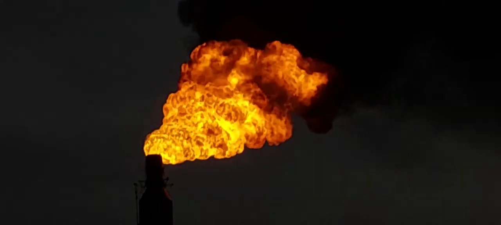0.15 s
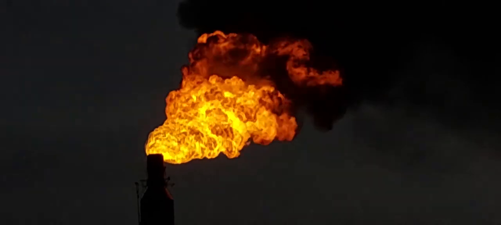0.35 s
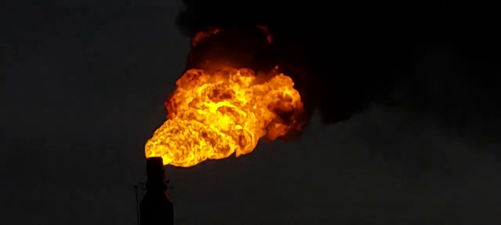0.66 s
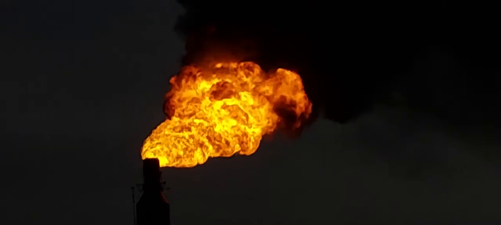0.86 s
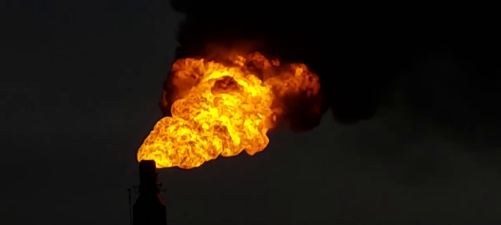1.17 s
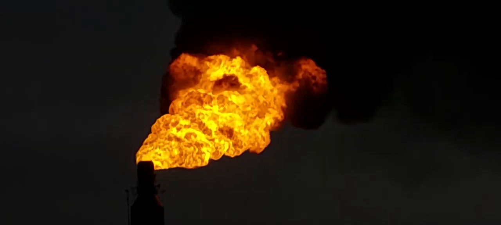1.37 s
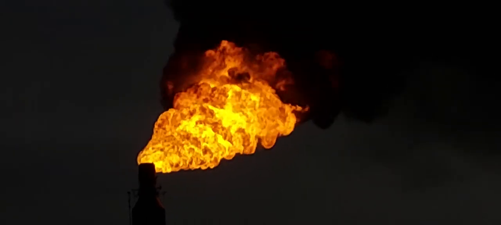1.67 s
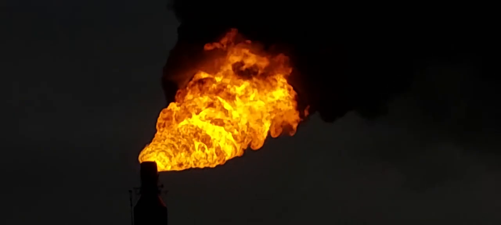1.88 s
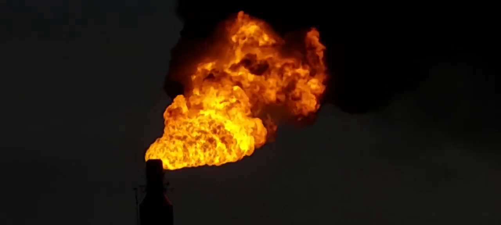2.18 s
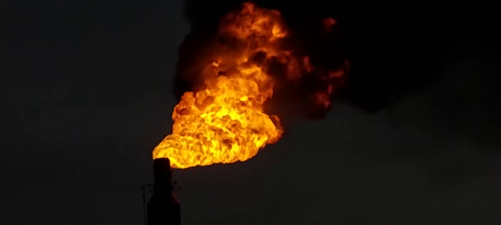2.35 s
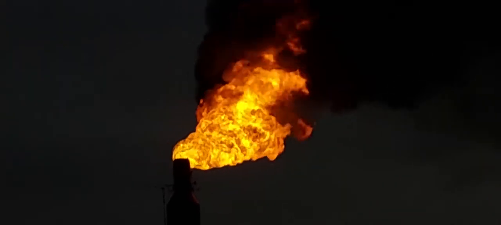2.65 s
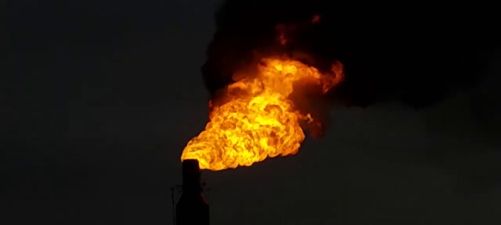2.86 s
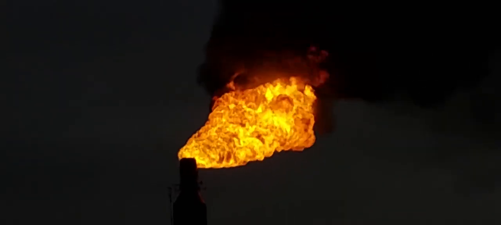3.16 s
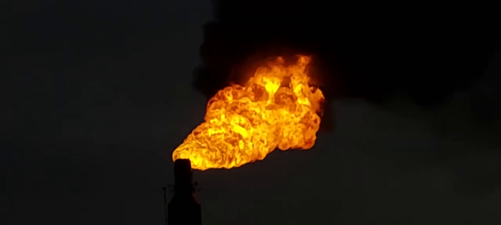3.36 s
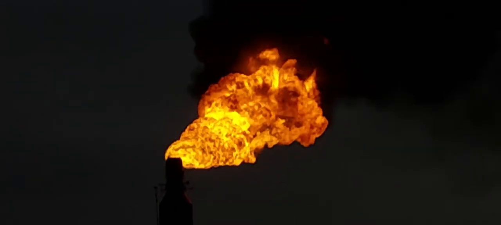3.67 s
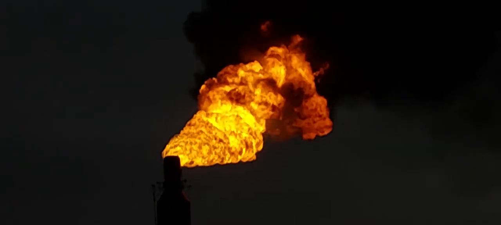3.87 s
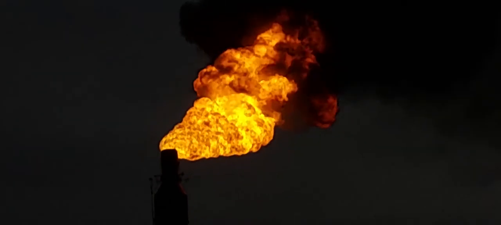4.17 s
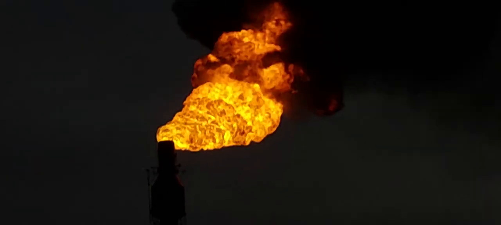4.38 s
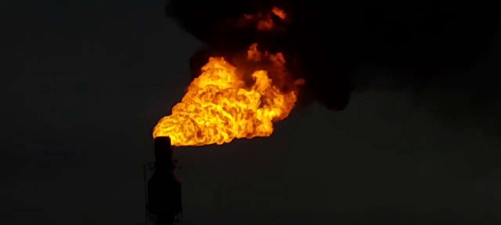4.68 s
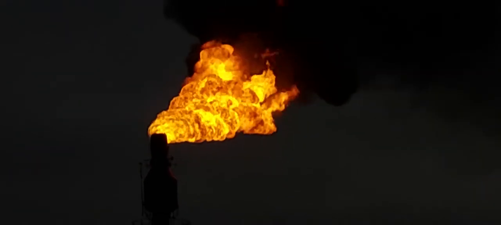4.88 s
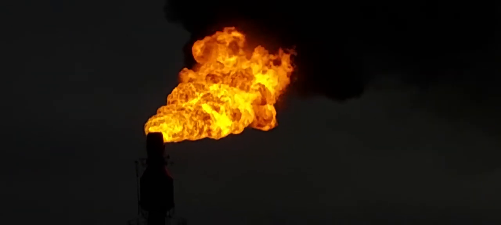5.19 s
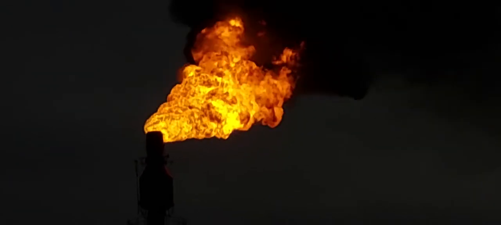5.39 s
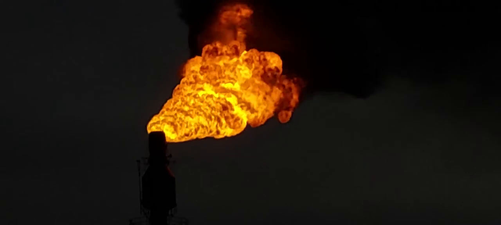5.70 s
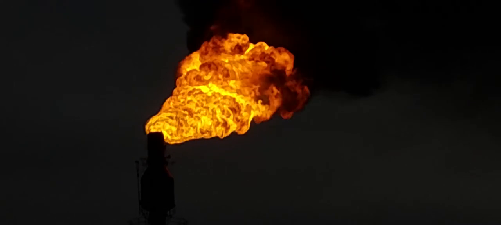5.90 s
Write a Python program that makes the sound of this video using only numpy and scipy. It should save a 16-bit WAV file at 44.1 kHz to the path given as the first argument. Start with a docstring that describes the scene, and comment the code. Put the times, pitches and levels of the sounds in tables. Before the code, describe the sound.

A big gas flare burns without pause on an offshore platform: a dense, low, rumbling roar arriving from the left and spreading diffusely off the steel deck. A strong steady bass hum from a diesel generator sits beneath, with beating motor drones. Thin turbine whines near two kilohertz flutter, and a fainter compressor tone sits higher. Two microphone ports hear it, the right one duller in the treble.

```python
"""A large gas flare roars on an offshore platform, as shaped noise arriving from the left; the steel deck
sends back a diffuse rumble. Behind it a diesel generator hums on its firing tone and cycle orders, and
machines drone as beating and wavering sines. Two turbines and a compressor whine through turbulent air.
Two microphone ports pick it up, the right one muffled in the treble."""
import sys
import numpy as np
from scipy import signal
from scipy.fft import rfft, irfft, next_fast_len
from scipy.io import wavfile
from scipy.ndimage import uniform_filter1d

SR = 44100
rng = np.random.default_rng(int(sys.argv[2]) if len(sys.argv) > 2 else 0)


def put_to_file(sound):
    """Save the sound as 16-bit audio at rate SR, in the file named by the first command-line argument."""
    columns = np.atleast_2d(sound).T  # one column per channel
    safe = np.clip(columns, -1, 1)
    whole_steps = np.round(safe * 32767)
    wavfile.write(sys.argv[1], SR, whole_steps.astype(np.int16))


N = 266364

# Flame strength; only the rumble's mean sets the flare's level, the rest is swell about the mean:
# (time [s], roar level [dB], rumble level [dB])
FLAME_SWELL = [(0.0, -41, -30), (0.6, -40.5, -29.5), (1.21, -40, -28.5), (1.81, -40.5, -30.5),
               (2.42, -40.5, -28.5), (3.02, -40, -28.5), (3.62, -40, -31), (4.23, -40, -29.5),
               (4.83, -40.5, -29), (5.44, -40, -31), (6.04, -39.5, -30)]
# Relative spectrum of the roar: (frequency [Hz], density [dB per Hz])
ROAR_SPECTRUM = [(20, -38.5), (45, -19), (70, -8.5), (130, -11.5), (260, -11), (400, -18.5), (500, -25),
                 (1000, -28), (1600, -35.5), (2900, -41.5), (6000, -45), (8000, -47), (9000, -60),
                 (15700, -63.5)]
# Resonances of pipes and steelwork: (frequency [Hz], width [Hz], height over the roar [dB])
STEEL_RESONANCES = [(247, 22, 4.5), (296, 25, -3), (320, 23, 4), (430, 36, 3), (537, 29, 4.5),
                    (625, 16, 1.5), (712, 55, 5), (935, 30, 2), (2255, 1380, 7.5), (3630, 380, 4),
                    (4260, 440, 3.5), (5370, 370, 2.5), (11300, 1500, 2)]
# Likeness of the ports: (frequency [Hz], share thrown back evenly by the deck [0-1], share from the left [0-1])
PORT_LIKENESS = [(60, 0.76, 0.079), (202, 0.67, 0.3), (397, 0.39, 0.3), (700, 0.27, .4), (1110, 0.12, 0.57),
                 (1550, .05, 0.24), (1990, 0.13, 0.45), (3500, 0.02, 0.39), (4960, .02, 0.097),
                 (6500, 0.02, 0.091)]
# Generator, six firings a cycle: (multiple of the cycle rate [1], level [dB])
CYCLE_ORDERS = [(3, -52.5), (5, -57.5), (7, -45), (8, -55), (9, -41.5), (12, -41.5), (18, -50), (19, -55),
                (24, -62.5), (30, -51), (36, -59.5)]
# Pairs of like motors slightly out of step: (frequency [Hz], level of the first motor [dB],
# partner faster by [Hz], partner relative level [dB], in step at [s], wavering share [0-1])
MOTOR_PAIRS = [(54.72, -35.6, 1.49, -8, 2.6, .1), (74.38, -37.3, .91, -8, 2.39, .55)]
# Machine tones: (frequency [Hz], level [dB], wavering share [0-1], wavering width [Hz])
DRONES = [(112.4, -48, .3, 1), (136.3, -45, .3, 1), (151.4, -44.5, .5, 1.5), (164.2, -49, .4, 1),
          (202.5, -43, .7, 3), (230.5, -45, .4, 1), (248.3, -46, .5, 2), (320.5, -42, .8, 5),
          (599, -58, .4, 2), (1088.1, -64, .3, 1), (1094.8, -62, .3, 1), (1203.8, -62, .3, 1),
          (1238.2, -62, .4, 2), (1350.5, -59.5, .3, 1), (1369, -65, .3, 1), (1465, -65, .3, 1),
          (1686, -67, .3, 1), (9648, -87, .9, 12), (9952, -91, .9, 12), (11458, -77.5, .9, 12)]
# Blade tones of slower turbine, faster turbine, compressor: frequency [Hz] each
BLADE_HZ = [2132.5, 2138.5, 5429]
# Their swell as the air drifts: (time [s], slower turbine [dB], faster turbine [dB], compressor [dB])
BLADE_SWELL = [(0.0, -52.5, -52.5, -57.0), (0.169, -44, -47.5, -55.5), (0.4, -56.5, -45.0, -59),
               (0.7, -53.0, -49.5, -53.5), (1.0, -51.5, -45.5, -55.0), (1.299, -50, -52, -67),
               (1.57, -60.5, -46.5, -55), (2.1, -53.5, -43.5, -58), (2.4, -50.5, -54.5, -60.5),
               (2.55, -52.5, -52, -62.0), (2.75, -49, -48, -60.5), (3.25, -58.0, -53, -61),
               (3.45, -56, -57, -51), (3.7, -44, -49.0, -59), (4.049, -56, -52.0, -58),
               (4.5, -50.5, -47.5, -59.5), (4.85, -45.5, -43.5, -59.5), (5.3, -58.5, -52.5, -59),
               (5.549, -52, -52, -51.5), (5.801, -50.5, -49.0, -67), (6.04, -52, -43.5, -61)]
# Their paths, one row each: (right port against left [dB], wavering share [0-1], wavering width [Hz],
# mean halo level [dB], halo width [Hz], likeness of the ports [0-1])
BLADE_PATHS = [(-9, 0.13, 6, -54, 23, 0.88), (1, 0.4, 6, -51.5, 17, .75), (-6.5, .55, 14, -63, 41, 0.51)]
# Their octaves, one row each: (mean level [dB], wavering width [Hz])
BLADE_OCTAVES = [(-66.5, 22), (-65, 22), (-80, 32)]
# Colour of the right port against the left: (frequency [Hz], gain [dB])
RIGHT_PORT_COLOUR = [(60, 1), (300, 1), (750, 3), (1150, -3), (2700, -1), (3700, -2), (4350, -1),
                     (5000, 1.5), (5600, 0.5), (6300, -13.5), (6900, -50), (8200, -40.5), (8600, -19.5),
                     (11000, -14.5), (15000, -18)]

LAG_S = .00054  # the right port hears the left-hand source later: about 19 cm more of air
FIRING_HZ, FIRING_DB = 89.92, -20.2
EDGE_HZ = 15750  # upper band limit of both ports


def gain_of(db):
    """Amplitude factor of a level in dB."""
    return 10 ** (np.asarray(db) / 20)


def evened(x):
    """Scale to an rms of one."""
    return x / np.sqrt(np.mean(abs(x) ** 2) + 1e-20)


def read_spectrum(points, hz):
    """Columns of a spectrum table, interpolated on a log-frequency axis."""
    f, *columns = np.transpose(points)
    return np.array([np.interp(np.log(hz + 1), np.log(f + 1), v) for v in columns])


def follow(rows, t):
    """Columns of a curve table at the times t."""
    s, *columns = np.transpose(rows)
    return np.array([np.interp(t, s, v) for v in columns])


def port_noises(a, b, c, d, like):
    """Complex noise at the left and right port, sharing a part set by their likeness."""
    left, own = a + 1j * b, c + 1j * d
    return np.array([left, like * left + np.sqrt(abs(1 - abs(like) ** 2)) * own])


def wavering(share, width, like):
    """Complex gain per port: a steady path plus paths scattered by moving air."""
    hop, warm_up = 64, 2000  # samples; steps that let the filter settle
    step = np.arange(0, N + hop, hop)
    a, b, c, d = rng.standard_normal((4, len(step) + warm_up))
    like, share = np.clip(like, 0, 1), np.clip(share, 0, 1)
    noises = port_noises(a, b, c, d, like)
    r = np.exp(-np.pi * width * hop / SR)  # one-pole smoothing: slower for a narrower width
    scattered = evened(signal.lfilter([1 - r], [1, -r], noises)[:, warm_up:])
    paths = np.sqrt(1 - share) + np.sqrt(share) * scattered
    return np.array([np.interp(np.arange(N), step, p) for p in paths])


def tone(turns, db, paths=np.ones((2, 1)), lag_turns=0.):
    """A sine of rms level db before its paths; the right port lags by lag_turns."""
    phase = turns + rng.random() - np.array([[0], [1]]) * lag_turns
    return np.sqrt(2) * gain_of(db) * (paths * np.exp(2j * np.pi * phase)).real


def flare():
    """Turbulent burning: wide noise ringing in the steelwork, partly direct from the left, partly diffuse."""
    size, hop = 8192, 2048
    frames, hz = N // hop + 5, np.fft.rfftfreq(size, 1 / SR)
    a, b, c, d, patches = rng.standard_normal((frames, len(hz), 5)).T
    # Patches of strength, smoothed over 40 bins and 3 frames
    patches = evened(uniform_filter1d(uniform_filter1d(patches, 40, 0), 3, 1))

    even, direct = read_spectrum(PORT_LIKENESS, hz)
    like = even + direct * np.exp(-2j * np.pi * hz * LAG_S)
    like = (like / np.maximum(abs(like), 1))[:, None]
    noises = port_noises(a, b, c, d, like)

    roar_db, rumble_db = follow(FLAME_SWELL, np.arange(frames) * hop / SR)
    low = 1 / (1 + (hz[:, None] / 450) ** 4)  # below about 450 Hz the rumble swells on its own
    swell_db = low * (rumble_db - rumble_db.mean()) + (1 - low) * (roar_db - roar_db.mean())
    rings_db = sum(db / (1 + (2 * (hz - f) / width) ** 2) for f, width, db in STEEL_RESONANCES)
    spectrum_db = read_spectrum(ROAR_SPECTRUM, hz).T + rings_db[:, None]
    noises *= gain_of(spectrum_db + swell_db + .5 * patches)
    roar = signal.istft(noises, nperseg=size, noverlap=size - hop)[1][:, :N]
    return gain_of(rumble_db.mean() + 1.5) * evened(roar)


def generator(t):
    """The firing tone dominates; unequal cylinders add the other orders of the cycle."""
    cycles = FIRING_HZ * t / 6
    # Almost steady, a hundredth of a turn earlier at the right port
    firing = tone(FIRING_HZ * t, FIRING_DB, wavering(0.00095, 2.4, 0.98), -.01)
    orders = sum(tone(k * cycles, db, wavering(0.18, 1.4, .9)) for k, db in CYCLE_ORDERS)
    return firing + orders


def motor_pairs(t):
    """Two nearly equal motor tones drift in and out of phase, so their level beats."""
    pairs = 0
    for hz, db, beat_hz, partner_db, in_step, share in MOTOR_PAIRS:
        beating = 1 + gain_of(partner_db) * np.exp(2j * np.pi * beat_hz * (t - in_step))
        pairs = pairs + tone(hz * t, db, beating * wavering(share, 4.1, 1.0), 0.044)
    return pairs * gain_of([[-.3], [.6]])  # a little stronger at the right port


def drones(t):
    """Pumps and fans: tones that waver on their way; those above 800 Hz come from the left."""
    return sum(tone(hz * t, db, wavering(share, width, 0.91), hz * LAG_S * (hz > 800))
               for hz, db, share, width in DRONES)


def whines(t):
    """Blade tones with a fluttering halo and their octave; the two turbines beat against each other."""
    out = 0
    swells = follow(BLADE_SWELL, t)
    for hz, db, (octave_db, octave_width), path in zip(BLADE_HZ, swells, BLADE_OCTAVES, BLADE_PATHS):
        right_db, share, width, halo_db, halo_width, like = path
        lag_turns = hz * LAG_S
        balance = gain_of([[-right_db / 2], [right_db / 2]])
        blade = tone(hz * t, db, wavering(share, width, like), lag_turns) * balance
        swell_db = db - db.mean()
        halo = tone(hz * t, halo_db + swell_db, wavering(0.95, halo_width, like), lag_turns)
        octave_paths = wavering(.85, octave_width, like)
        octave = tone(2 * hz * t, octave_db + swell_db, octave_paths, 2 * lag_turns)
        out = out + blade + halo + octave
    return out


def scene():
    """The flare in front, then the generator, the machines and the whines."""
    t = np.arange(N) / SR
    return flare() + generator(t) + motor_pairs(t) + drones(t) + whines(t)


def record(dry):
    """The two microphone ports: the right port's colour, then the band limit on both."""
    size = next_fast_len(N)
    colour_db = read_spectrum(RIGHT_PORT_COLOUR, np.fft.rfftfreq(size, 1 / SR))[0]
    right = irfft(rfft(dry[1], size) * gain_of(colour_db), size)[:N]
    ports = np.array([dry[0], right])
    band_limit = signal.firwin(1023, EDGE_HZ, window=("kaiser", 10), fs=SR)
    return signal.oaconvolve(ports, band_limit[None], "same")


dry = scene()
out = record(dry)
put_to_file(out)
```